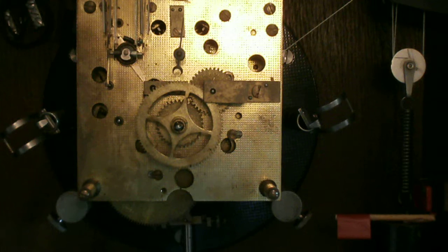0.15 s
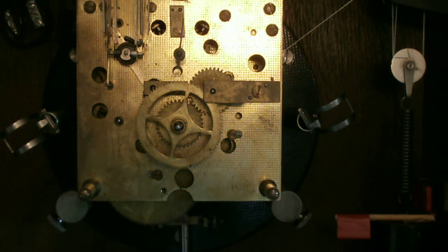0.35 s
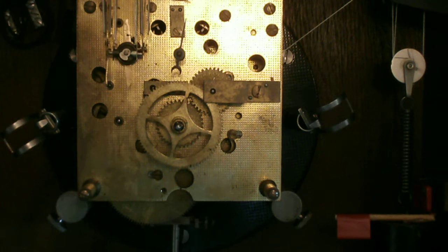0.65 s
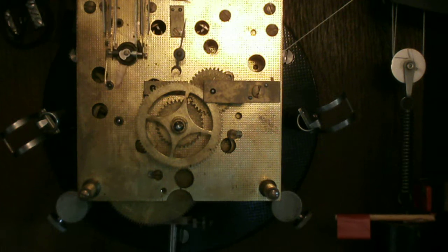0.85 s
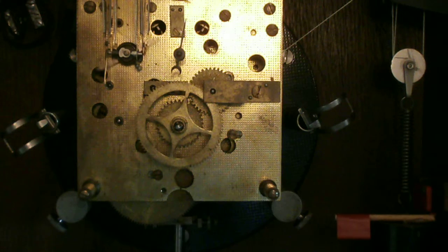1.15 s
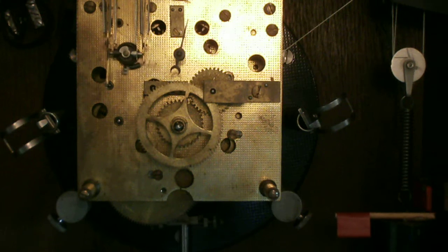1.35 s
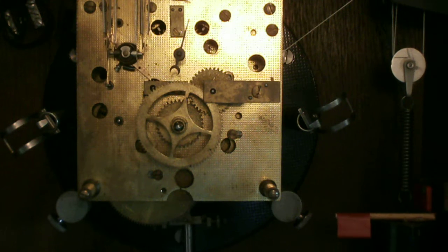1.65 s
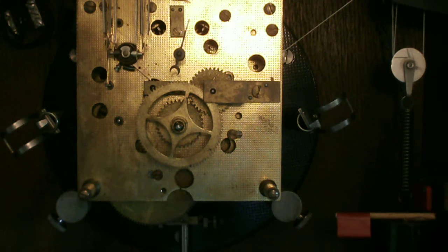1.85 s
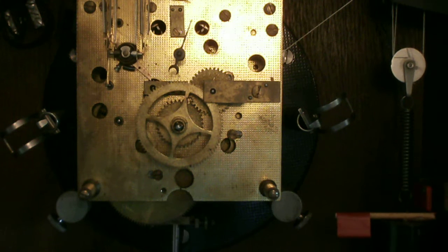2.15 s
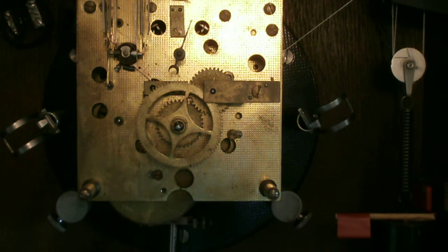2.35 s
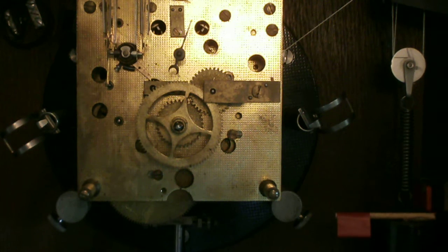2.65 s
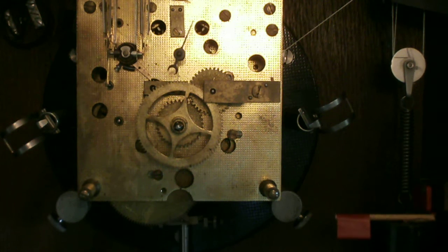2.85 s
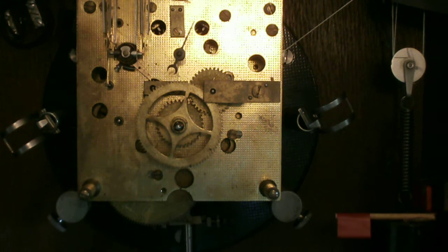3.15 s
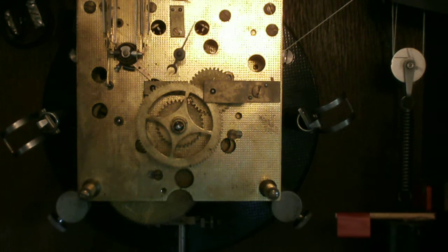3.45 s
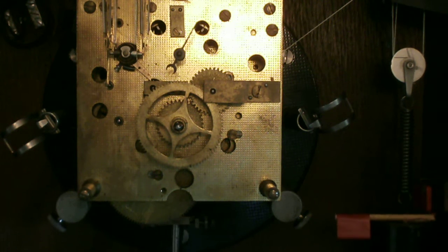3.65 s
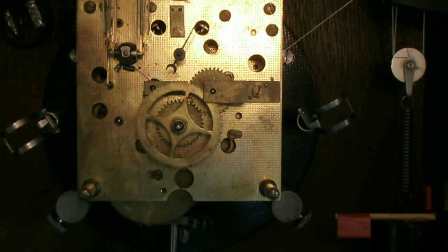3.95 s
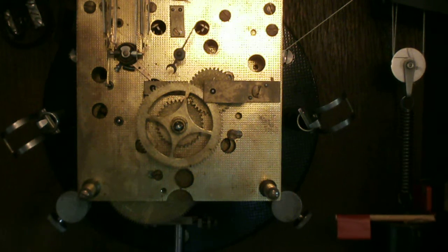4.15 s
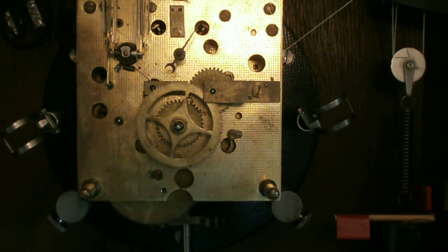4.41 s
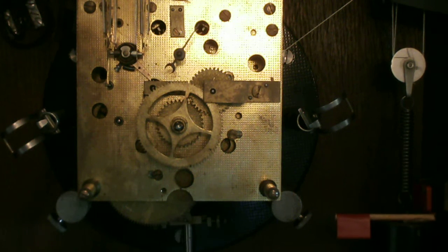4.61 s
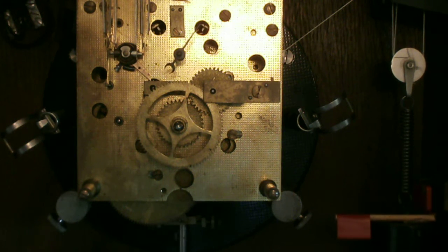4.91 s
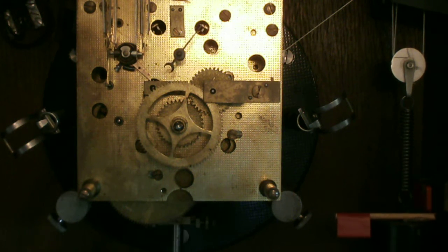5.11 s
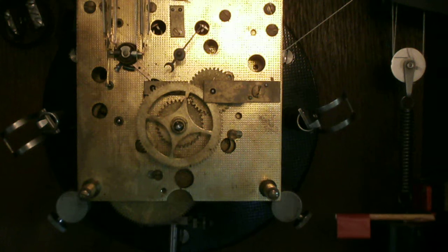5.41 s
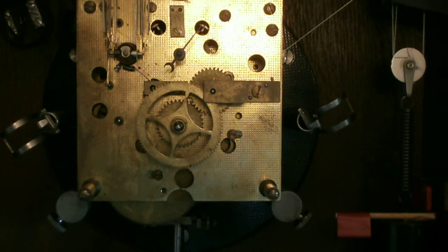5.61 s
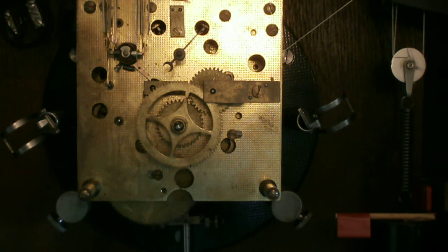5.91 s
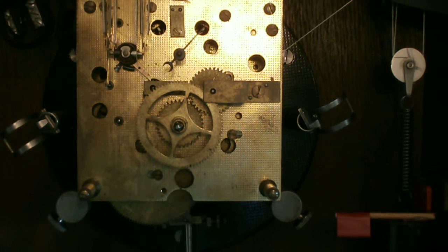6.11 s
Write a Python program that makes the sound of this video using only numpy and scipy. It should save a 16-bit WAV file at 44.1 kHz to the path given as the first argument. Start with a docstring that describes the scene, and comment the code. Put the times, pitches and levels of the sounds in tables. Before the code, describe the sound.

A pendulum clock ticks lightly and a little unevenly, while a relay clacks loudly once and rattles back in a small room.

```python
"""A pendulum clock ticks lightly in its wooden case, a little unevenly, as two catches (pallets)
take turns stopping a toothed wheel. Once, a lever drops and switches on a relay: its magnet pulls
in an iron arm with a loud clack, a contact snaps open and the arm rattles back, knocking the case.
A small room echoes briefly, over a low rush of air, hiss and a thin electronic whine."""
import sys
import numpy as np
from scipy import signal
from scipy.fft import rfft, irfft, next_fast_len
from scipy.io import wavfile

SR = 44100
rng = np.random.default_rng(int(sys.argv[2]) if len(sys.argv) > 2 else 0)


def to_wav(sig):
    """Store sig (one row per channel, or 1-D mono) as 16-bit WAV at the path in sys.argv[1].

    Samples outside -1..1 are clipped; the rate is SR.
    """
    pcm = np.clip(np.atleast_2d(sig), -1, 1) * 32767
    pcm = np.round(pcm).astype(np.int16)
    wavfile.write(sys.argv[1], SR, pcm.T)  # frames by channels


N = 276504
SCENE_TIME_S = np.arange(N) / SR
HIT_TIME_S = np.arange(SR // 2) / SR  # time since one hit
CURRENT_ON_S, CURRENT_OFF_S = 1.0214, 1.3294  # when the relay is switched


# Tone colour of the brass clockwork's clatter: pitch_hz, level_db
CLOCKWORK_CLATTER = [(150, -25), (500, 7.5), (1000, -0.5), (1500, 0.5), (3000, -2), (4200, -1), (5600, 0),
                     (7000, -10), (8500, -1), (10500, -14), (16000, -22)]
# Ringing notes of the clock's plates: pitch_hz, fade_s (time to fall 60 dB), tick_db, tock_db
PLATE_NOTES = [(700, .08, -19, -12), (835, .08, -15, -9), (915, .07, -8, -17), (980, .08, -5, -3),
               (1860, .09, -22, -8), (1990, .1, -15, -9), (3900, .035, -8, -6), (4270, .04, -20, -8),
               (5170, .05, -9, -15), (5540, .03, -3, -6), (6040, .06, -11, -14), (6460, .08, -13, -11),
               (7420, .04, -5, -20)]
def pallet(first_s, note_levels_db, period_s=1.5, fresh_share=.3):
    """A tooth lands on one pallet once per full swing; part of the clatter differs each time."""
    pitch_hz, fade_s, _, _ = np.transpose(PLATE_NOTES)
    landing = lambda: clatter(CLOCKWORK_CLATTER, hold_s=.0018, fade_s=.027)
    steady = np.sqrt(1 - fresh_share) * landing()
    steady += gain(2) * ring(zip(pitch_hz, fade_s, note_levels_db), attack_s=.00089)
    beats = [(start_s, -38.5) for start_s in np.arange(first_s, N / SR, period_s)]
    return place_hits(beats, lambda: steady + np.sqrt(fresh_share) * landing())


def clock_ticks():
    """Two pallets take turns and shake the same plates at different points: tick, then tock."""
    first_tick_s, tock_after_s = .5784, .8145  # over half a full swing apart, so the beat limps
    _, _, tick_db, tock_db = np.transpose(PLATE_NOTES)
    ticks = pallet(first_tick_s, tick_db)
    tocks = pallet(first_tick_s + tock_after_s, tock_db)
    return in_room(ticks + tocks, echo_db=-10.5)


# The iron arm pulls in, then falls back: start_s, level_db, first_bounce_s, bounce_loss_db, knock_db
ARM_STROKES = [(1.2143, -7, .0052, 5, -16), (1.3530, -15.5, .0045, 1.2, -18.5)]
# Tone colour of the arm's clatter: pitch_hz, level_db
ARM_CLATTER = [(200, -40), (750, 2.5), (1050, -19), (1400, 2), (1900, -22), (2700, -2), (3900, -1),
               (5600, 2.5), (6900, 7.5), (8200, -4), (9500, -9), (12000, -9), (16000, -16)]
# Ringing notes of the arm: pitch_hz, fade_s, level_db
ARM_NOTES = [(2680, .1, -24), (3880, .05, -19), (4470, .06, -17), (5220, .05, -16), (5990, .08, -17),
             (6740, .05, -11), (6970, .2, -17), (7570, .1, -22), (8345, .1, -24)]
def relay_arm(bounce_shrink=.65):
    """Iron hits iron and bounces twice, each bounce sooner and weaker than the last."""
    hits = []
    for start_s, level_db, first_bounce_s, bounce_loss_db, _ in ARM_STROKES:
        for bounce in range(3):
            hits.append((start_s, level_db - bounce_loss_db * bounce))
            start_s += first_bounce_s * bounce_shrink ** bounce
    clack = lambda: (clatter(ARM_CLATTER, hold_s=.0012, fade_s=.018)
                     + gain(-5) * ring(ARM_NOTES, attack_s=.00044))
    return in_room(place_hits(hits, clack), echo_db=-9.5)


# Tone colour of the contact's snap: pitch_hz, level_db
SNAP_CLATTER = [(200, -24), (600, -3), (1000, 3), (1400, -16), (2000, -2.5), (3200, 3), (4500, 3),
                (6500, -1.5), (8500, -4), (11000, -11.5), (16000, -10)]
# Ringing notes of its flat spring: pitch_hz, fade_s, level_db
SPRING_NOTES = [(1950, .045, -7), (2825, .06, -9), (3240, .09, -14), (3355, .09, -12), (3470, .09, -13),
                (4450, .05, -9), (6730, .05, -11)]
def contact_spring():
    """A flat spring snaps away, cutting the current, and rings near 3 kHz."""
    snap = clatter(SNAP_CLATTER, hold_s=.0025, fade_s=.041)
    snap += gain(1.5) * ring(SPRING_NOTES, attack_s=.0014)
    return in_room(place_hits([(CURRENT_OFF_S, -14)], lambda: snap), echo_db=-6.5)


# Tone colour of the lever's landing: pitch_hz, level_db
LEVER_CLATTER = [(200, -18), (500, -11), (750, 0), (1050, -7.5), (1400, -1.5), (1900, -8.5), (2600, 3),
                 (3200, -10.5), (4400, 4), (5300, -13), (6700, 7.5), (8200, -5), (10000, -16), (16000, -12)]
# Ringing notes of the lever: pitch_hz, fade_s, level_db
LEVER_NOTES = [(705, .1, -14), (1290, .07, -24), (2590, .07, -19), (2690, .03, -8), (4470, .03, -4),
               (4650, .18, -28), (6720, .025, -1), (7390, .05, -16)]
def trip_lever():
    """A light steel lever falls with a dry snap and switches the current on."""
    snap = clatter(LEVER_CLATTER, hold_s=.0036, fade_s=.031)
    snap += gain(-5) * ring(LEVER_NOTES, attack_s=.0005)
    return in_room(place_hits([(CURRENT_ON_S, -16)], lambda: snap), echo_db=-11.5)


# Ringing notes of the wooden case: pitch_hz, fade_s, pull_in_db, fall_back_db
WOOD_NOTES = [(151, .3, -8, -24), (248, .22, -6, -8), (395, .22, -11, -22), (533, .13, 1, -22),
              (572, .08, -5, -22), (700, .06, 1, -7), (748, .1, -3, 0), (850, .06, -3, -16),
              (935, .16, -24, -14)]
# Tone colour of the whole case's dull thud: pitch_hz, level_db
CASE_THUD = [(20, -60), (80, -36), (135, -3), (200, -16), (400, -2), (850, -1), (1200, -24), (3000, -46)]
def case_knock(delay_s=.00228, build_cycles=2):
    """Each stroke of the arm shakes the wood just after the metal; the low notes swell last."""
    def wood(levels_db):
        notes = zip(pitch_hz, fade_s, levels_db)
        return sum(ring([(hz, fade, db)], attack_s=build_cycles / hz) for hz, fade, db in notes)

    pitch_hz, fade_s, pull_in_db, fall_back_db = np.transpose(WOOD_NOTES)
    pull_hit, fall_hit = [(start_s + delay_s, knock_db) for start_s, *_, knock_db in ARM_STROKES]
    knock = wood(pull_in_db) + gain(-12) * clatter(CASE_THUD, hold_s=.0042, fade_s=.19)
    pull = place_hits([pull_hit], lambda: knock)
    fall = place_hits([fall_hit], lambda: wood(fall_back_db))
    return in_room(pull + fall, echo_db=-15.5)


# Clicks of a small latch, before each stroke and as it comes to rest: start_s, level_db
LATCH_CLICKS = [(1.2062, -23), (1.3145, -21.5), (1.4343, -33)]
# Tone colour of one click: pitch_hz, level_db
LATCH_CLATTER = [(300, -15), (1500, -14), (2700, -5), (4000, -1), (5300, -7), (6800, 3), (8200, 3),
                 (10000, -5), (12500, -2), (16000, -13)]
def latch():
    """A tiny steel latch makes thin, bright clicks with no body."""
    clicks = place_hits(LATCH_CLICKS, lambda: clatter(LATCH_CLATTER, hold_s=.001, fade_s=.024))
    return in_room(clicks, echo_db=-17)


def coil_hum(pitch_hz=100, rise_s=.07, fall_s=.012):
    """Pulsing current shakes the magnet's core: a hum builds while it is on, then dies away."""
    rise = 1 - np.exp(-np.maximum(SCENE_TIME_S - CURRENT_ON_S, 0) / rise_s)
    fall = np.exp(-np.maximum(SCENE_TIME_S - CURRENT_OFF_S, 0) / fall_s)
    return gain(-50.5) * rise * fall * unit_level(np.sin(2 * np.pi * pitch_hz * SCENE_TIME_S))


# How long the room's echo lasts: pitch_hz, fade_s
ROOM_FADES = [(150, 0.81), (700, 0.38), (3000, .26), (7000, 0.21), (15000, 0.27)]
def in_room(sound, echo_db):
    """Adds the small room's echo, in which low notes last longest."""
    hz, time_s, spectrum = signal.stft(rng.standard_normal(len(HIT_TIME_S)), SR, nperseg=256)
    spectrum *= gain(-60 * time_s / value_at(ROOM_FADES, hz)[:, None])
    tail = signal.istft(spectrum, SR, nperseg=256)[1][:len(HIT_TIME_S)]
    tail *= 1 - np.exp(-HIT_TIME_S / .0075)
    return sound + gain(echo_db) * signal.fftconvolve(sound, tail / np.linalg.norm(tail))[:N]


# Tone colour of the steady rush of air: pitch_hz, level_db
STEADY_AIR = [(20, -19.5), (50, -7), (100, -2.5), (190, -1), (400, -5), (1000, -13), (2000, -19),
              (5000, -25), (16000, -35.5)]
# Tone colour of its wavering low part: pitch_hz, level_db
AIR_RUMBLE = [(40, -27), (130, -0.5), (250, 0.5), (400, -4.5), (900, -23.5), (4000, -70)]
# Tone colour of the electronic hiss: pitch_hz, level_db
ELECTRONIC_HISS = [(500, -2.5), (4000, -6.5), (6500, -5), (7600, 0.5), (8400, -2.5), (8700, 0.5),
                   (9000, 0.5), (9300, 4), (10200, -1), (10900, -2), (11400, -7), (14500, -6), (15200, 1),
                   (15800, -8)]
def background(whine_hz=14947):
    """The room's low rush swells a little; electronics add hiss and a slightly unsteady whine."""
    swell = noise([(.5, -10), (2, 0), (8, 0), (20, -20), (100, -80)], N)
    flutter = noise([(1, 0), (40, 0), (300, -18), (1500, -60)], N)
    air = gain(-50) * noise(STEADY_AIR, N)
    rumble = gain(-58.5 + 3 * swell) * noise(AIR_RUMBLE, N)
    hiss = gain(-53) * noise(ELECTRONIC_HISS, N)
    whine = gain(-59.5) * unit_level(np.sin(2 * np.pi * whine_hz * SCENE_TIME_S + .3 * flutter))
    return air + rumble + hiss + whine


def clatter(colour, hold_s, fade_s, delay_at_1khz_s=.001605):
    """Countless tiny vibrations chatter, then die; low notes travel slower and arrive later."""
    attack = 1 - np.exp(-HIT_TIME_S / .0002)
    fade = gain(-60 * np.maximum(HIT_TIME_S - hold_s, 0) / fade_s)
    burst = noise(colour, len(HIT_TIME_S)) * attack * fade
    delay_cycles = 2 * delay_at_1khz_s * np.sqrt(1000 * np.fft.rfftfreq(len(burst), 1 / SR))
    return irfft(rfft(burst) * np.exp(-2j * np.pi * delay_cycles), len(burst))


def ring(notes, attack_s, blur_hz=5):
    """A struck part rings with fading, slightly unsteady tones that build as the hit spreads."""
    tones = 0
    for pitch_hz, fade_s, level_db in notes:
        cycles = pitch_hz * HIT_TIME_S + rng.random()
        drift = np.cumsum(rng.standard_normal(len(HIT_TIME_S))) * np.sqrt(blur_hz / (2 * np.pi * SR))
        tones += gain(level_db - 60 * HIT_TIME_S / fade_s) * np.sin(2 * np.pi * (cycles + drift))
    return tones * (1 - np.exp(-HIT_TIME_S / attack_s))


def place_hits(hits, make_sound):
    """Plays make_sound() at each (start_s, level_db) row."""
    track = np.zeros(N + SR)
    for start_s, level_db in hits:
        track[round(start_s * SR):][:len(HIT_TIME_S)] += gain(level_db) * make_sound()
    return track[:N]


def noise(colour, size):
    """Noise whose tone colour follows (pitch_hz, level_db) rows; only their differences count."""
    hz = np.fft.rfftfreq(size, 1 / SR)
    phases = np.exp(2j * np.pi * rng.random(len(hz)))
    return unit_level(irfft(gain(value_at(colour, hz)) * phases, size))


def value_at(rows, hz):
    """Reads between (pitch_hz, value) rows, with octaves evenly spaced."""
    pitch_hz, values = np.transpose(rows)
    return np.interp(np.log(hz + 1), np.log(pitch_hz + 1), values)


def gain(db):
    """Turns decibels into a multiplier."""
    return 10 ** (np.asarray(db) / 20)


def unit_level(sound):
    """Scales a sound to an average (rms) level of 1."""
    return sound / np.sqrt(np.mean(sound ** 2) + 1e-20)


def scene():
    """The clock, one cycle of the relay and the background, in one channel."""
    relay = trip_lever() + coil_hum() + latch() + relay_arm() + contact_spring() + case_knock()
    return (clock_ticks() + relay + background())[None]


def record(dry):
    """The microphone rounds the hardest peaks; the recorder cuts the top treble and sits off zero."""
    ceiling, offset, top_hz = .8, -.0029, 15800
    rounded = dry / (1 + (dry / ceiling) ** 4) ** (1 / 4)
    size = next_fast_len(N + SR // 2)
    kept_band = np.fft.rfftfreq(size, 1 / SR) < top_hz
    return irfft(rfft(rounded, size) * kept_band, size)[:, :N] + offset


dry = scene()
out = record(dry)
to_wav(out)
```